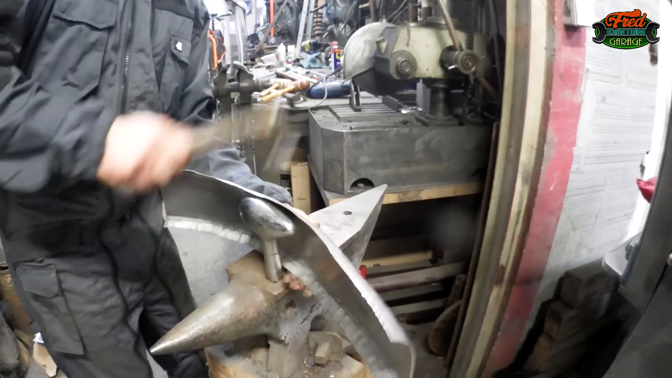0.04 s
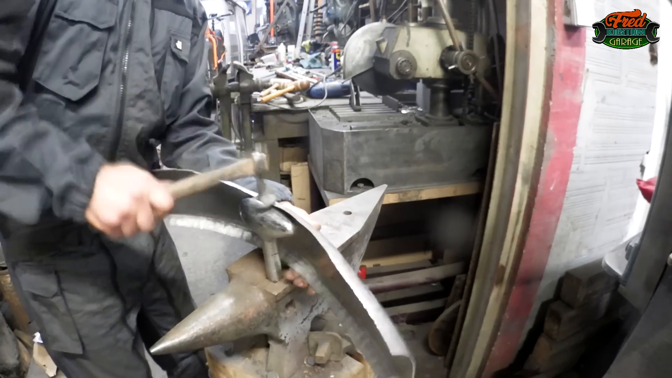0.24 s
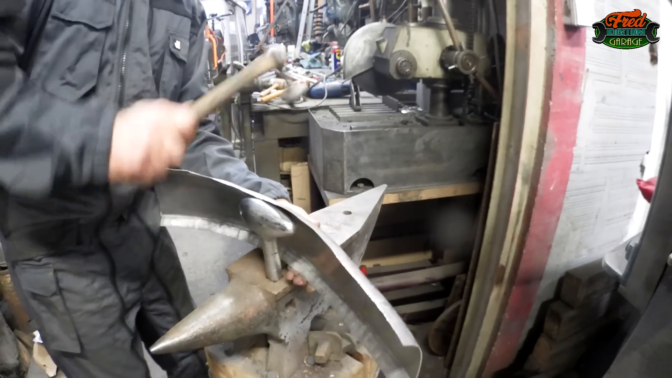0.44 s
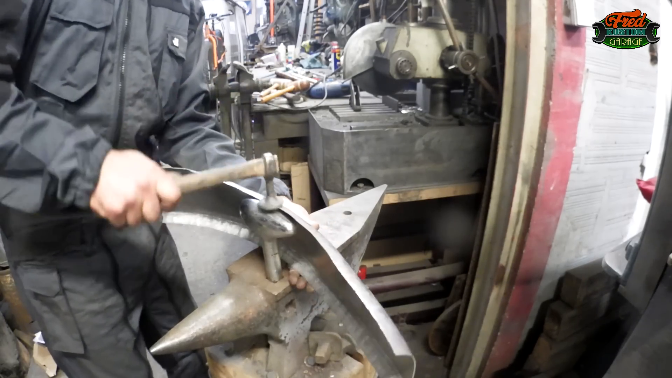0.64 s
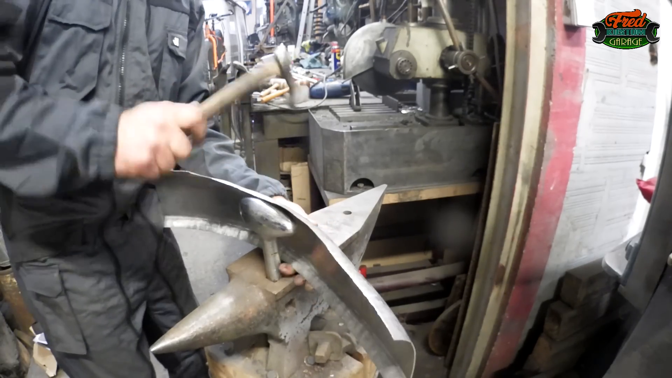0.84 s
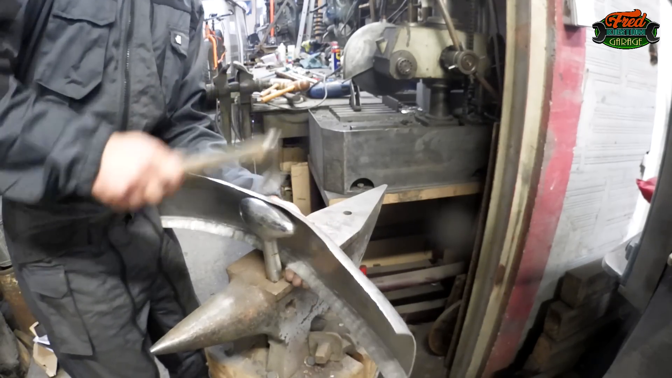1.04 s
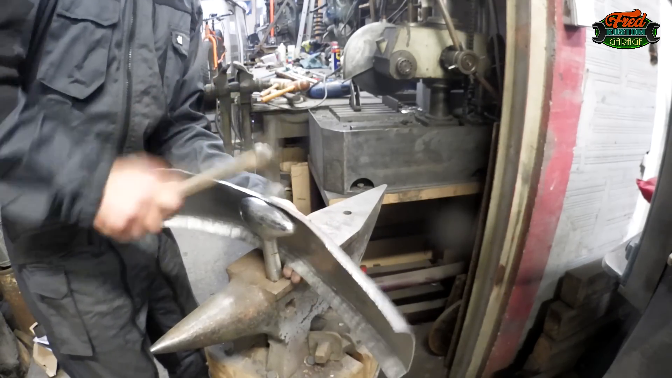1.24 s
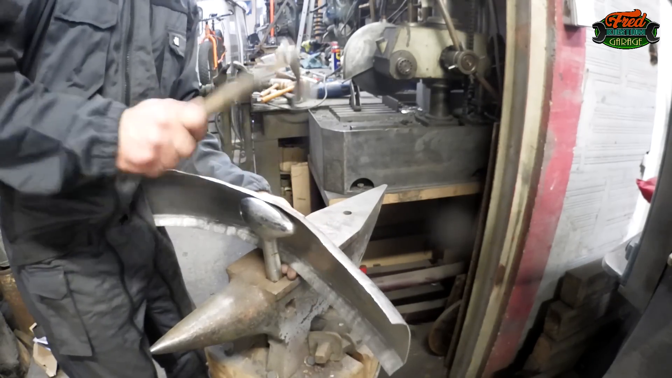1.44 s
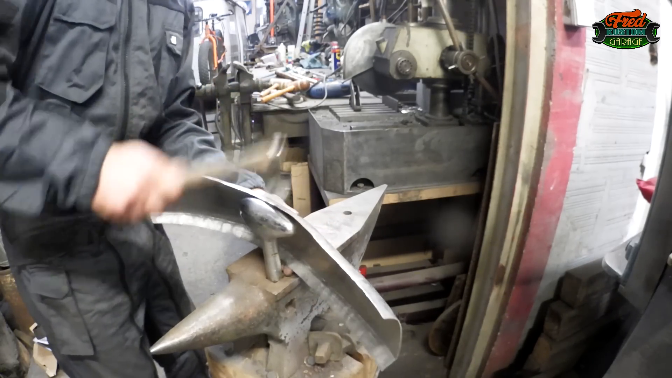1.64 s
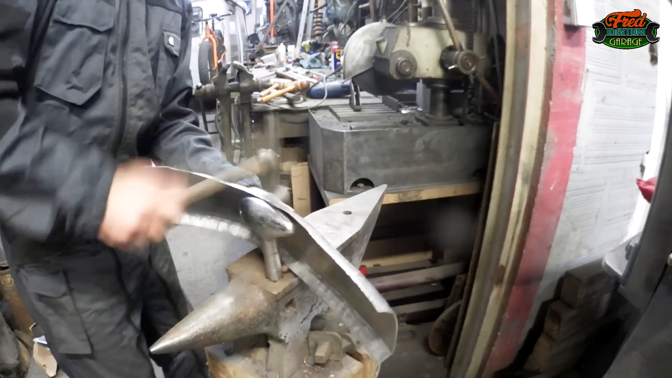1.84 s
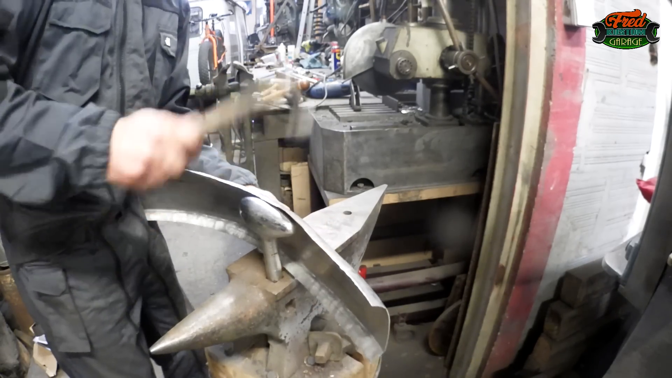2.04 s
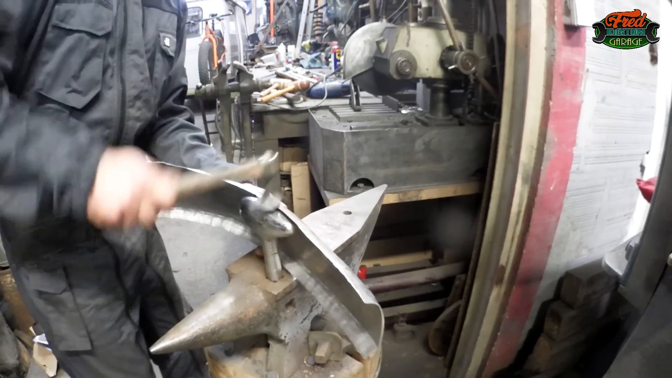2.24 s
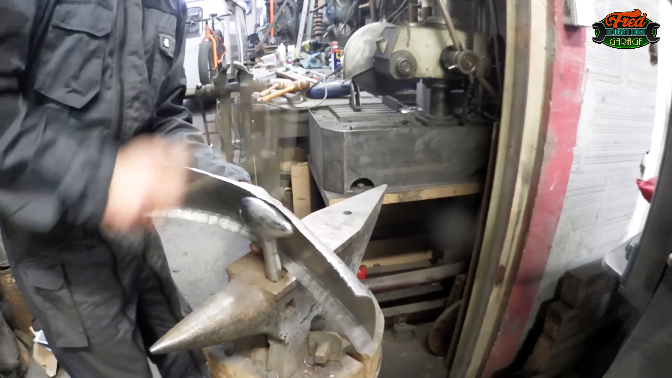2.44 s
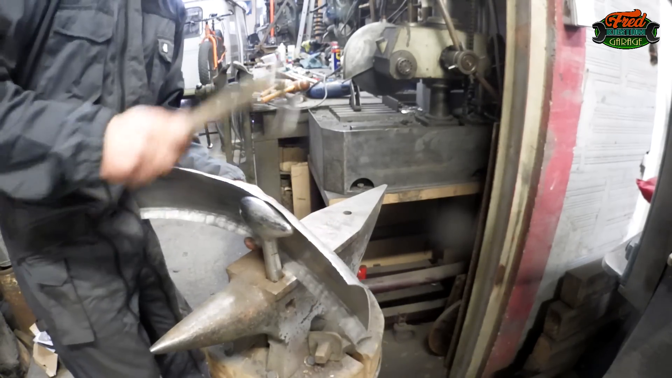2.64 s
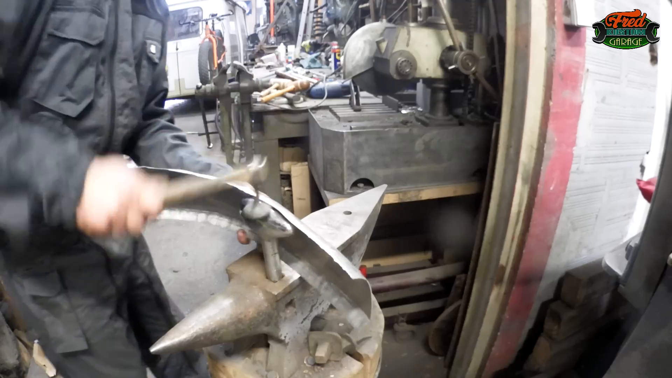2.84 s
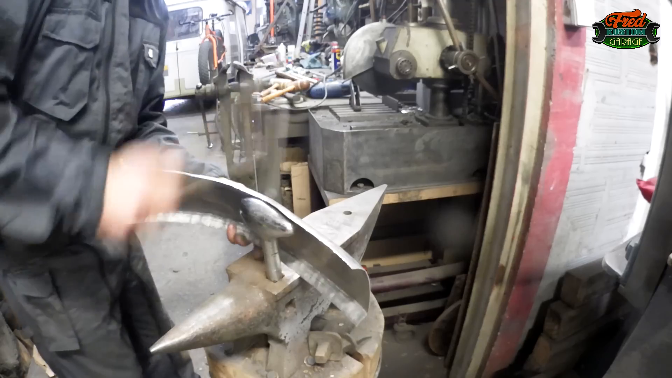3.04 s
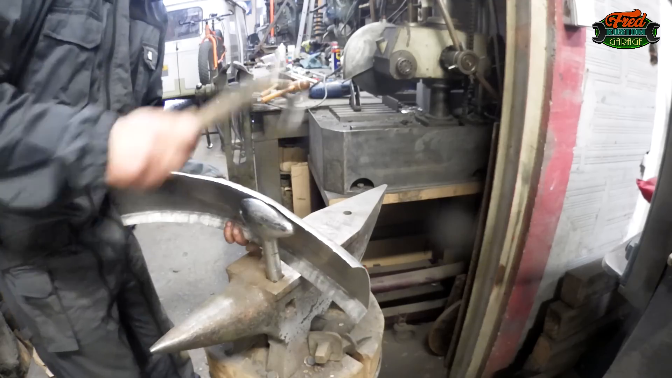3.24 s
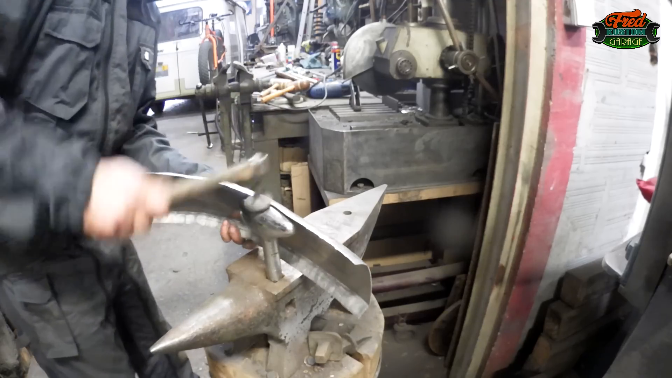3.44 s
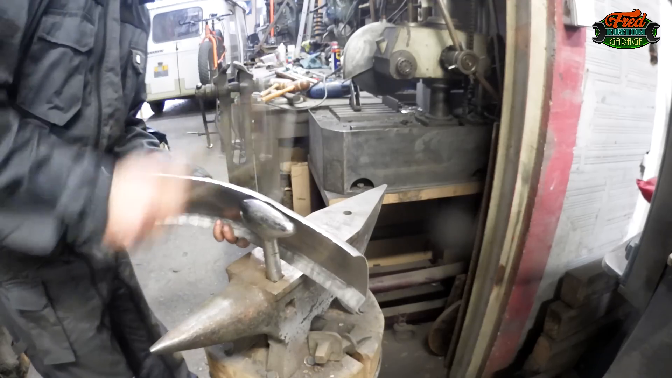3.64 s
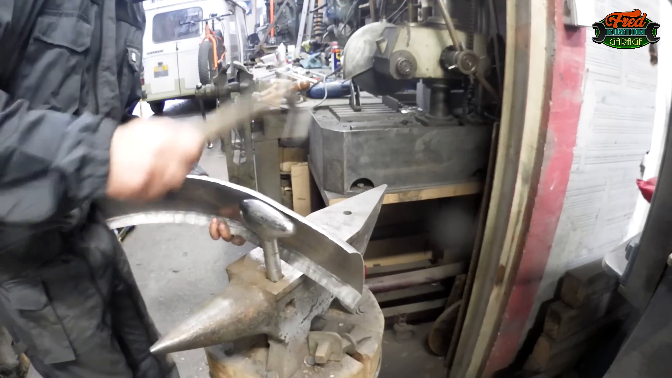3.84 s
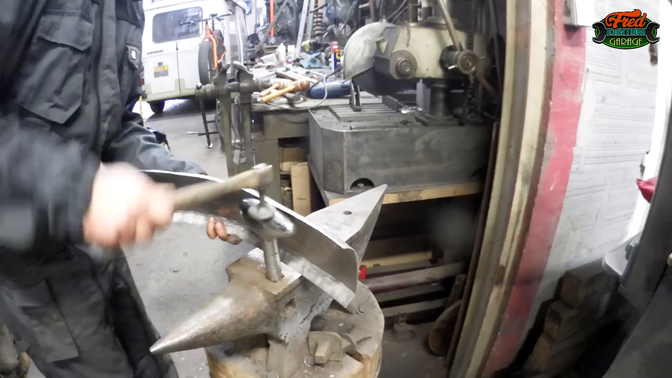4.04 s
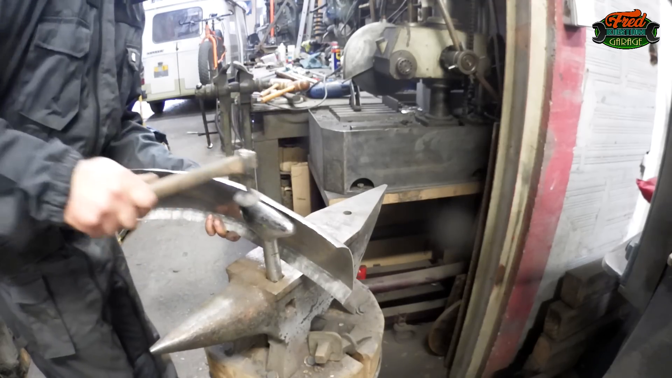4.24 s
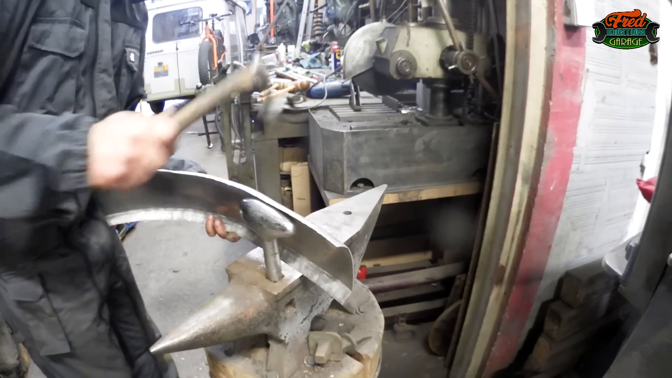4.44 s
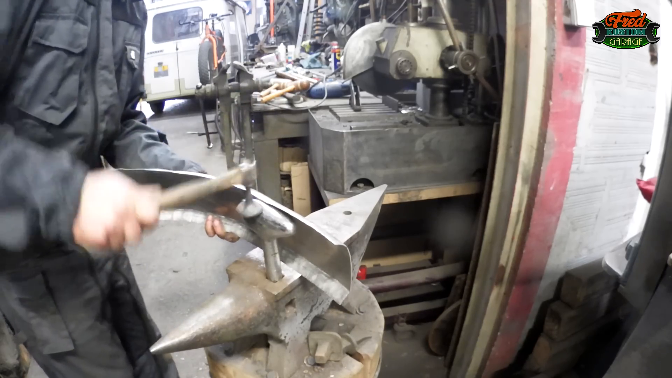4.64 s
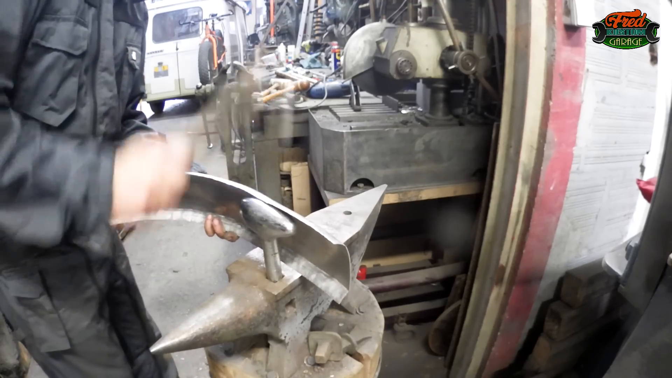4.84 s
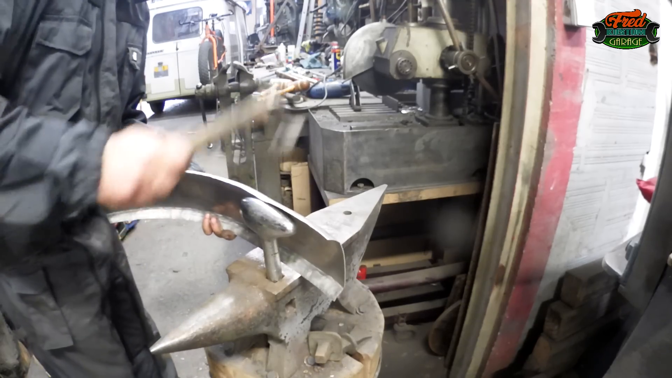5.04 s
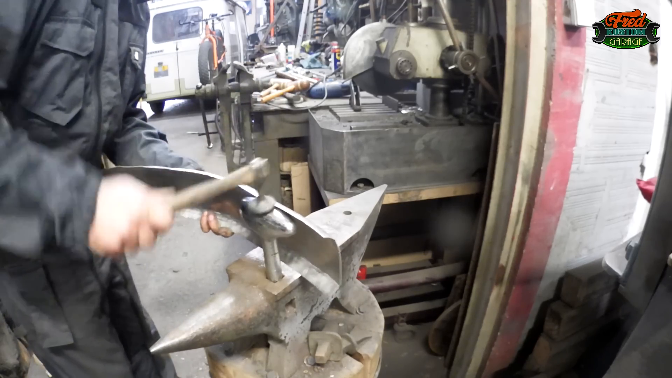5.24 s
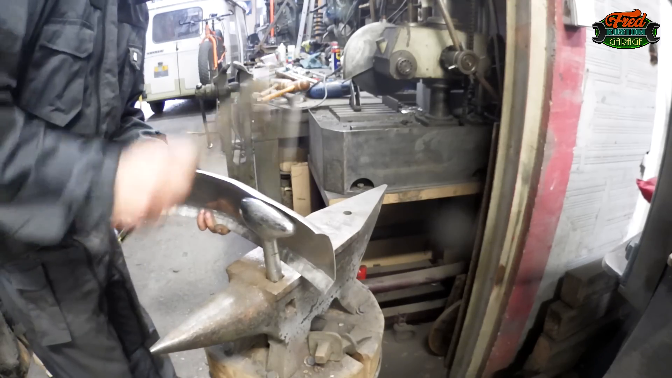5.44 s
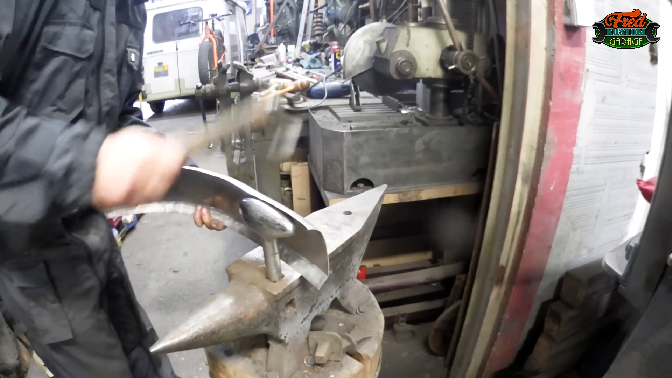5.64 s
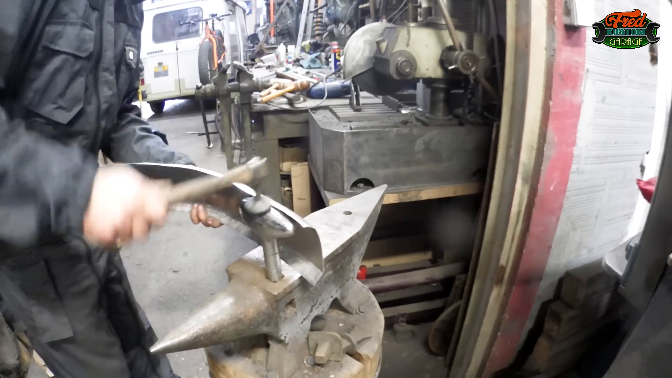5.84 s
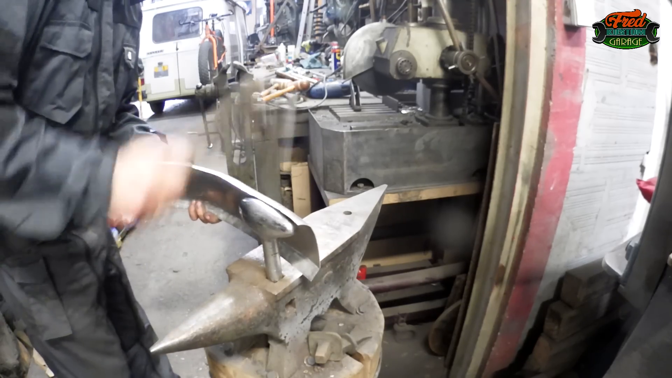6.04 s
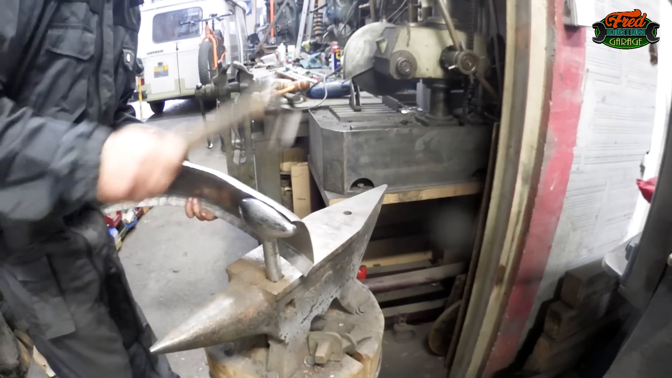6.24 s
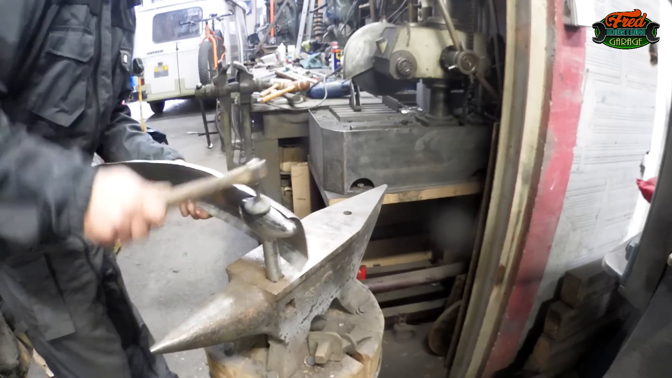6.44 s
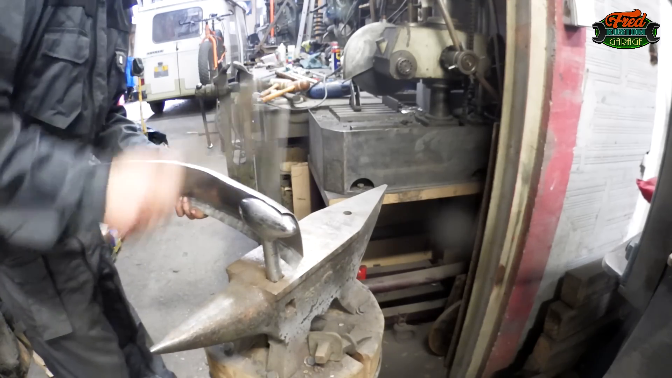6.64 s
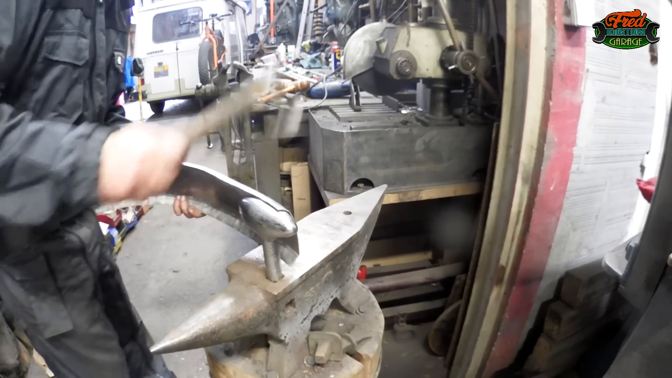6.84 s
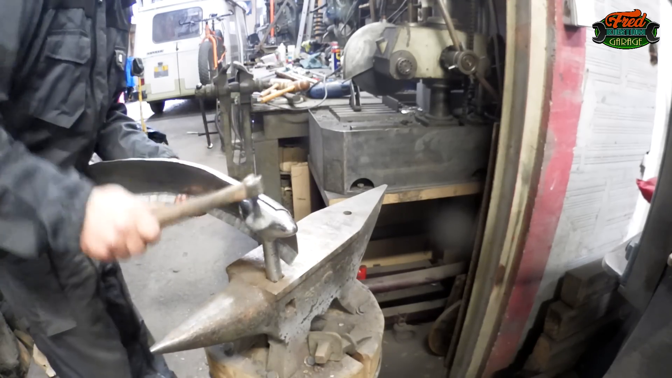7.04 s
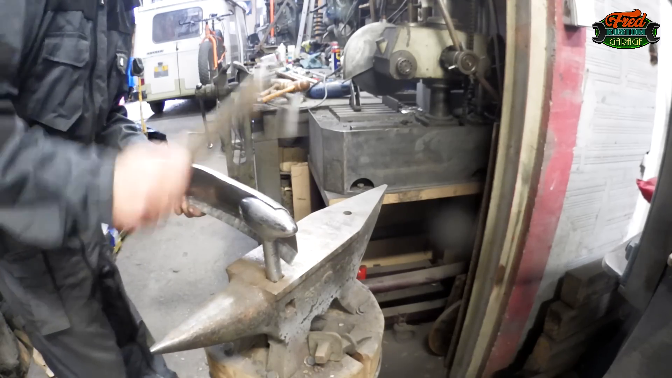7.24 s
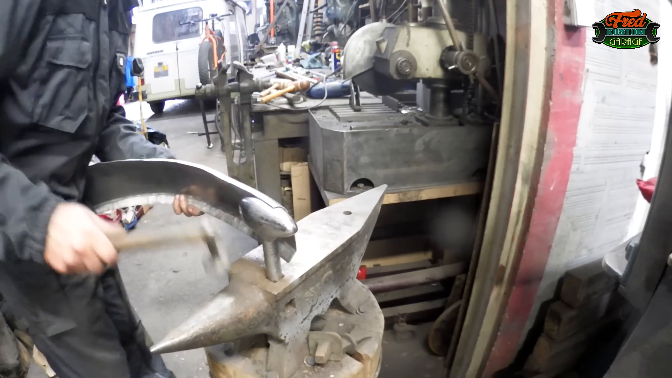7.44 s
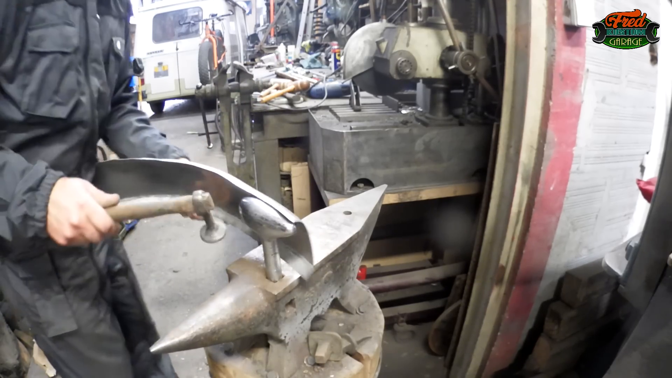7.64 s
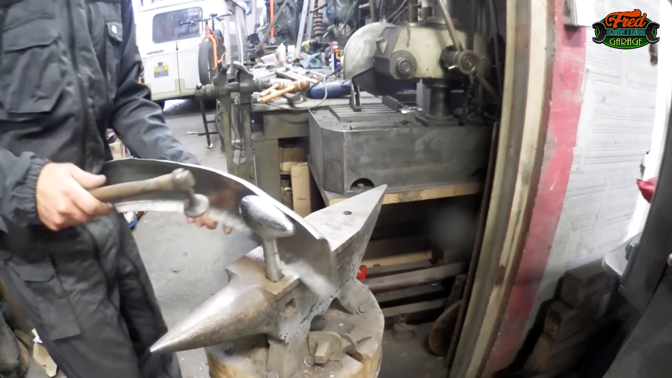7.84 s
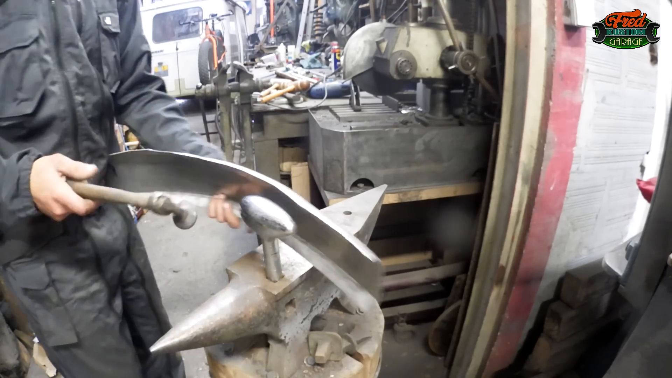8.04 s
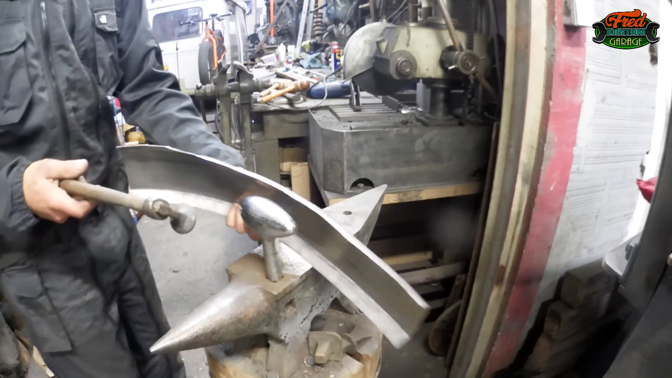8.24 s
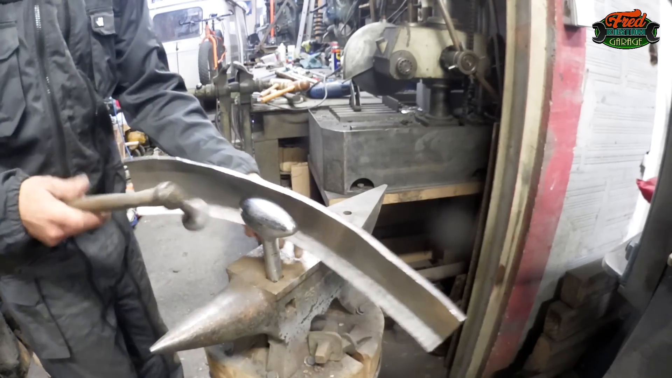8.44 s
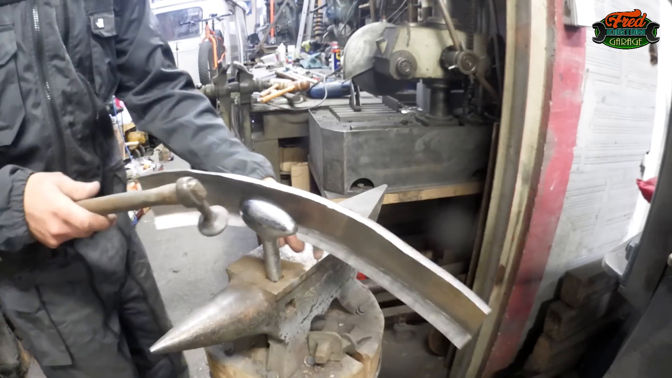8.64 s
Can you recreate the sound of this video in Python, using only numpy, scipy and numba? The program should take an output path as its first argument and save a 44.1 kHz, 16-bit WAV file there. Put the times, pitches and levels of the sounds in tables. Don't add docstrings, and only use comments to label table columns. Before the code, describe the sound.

Loud, bright metallic blows come in a quick even rhythm, varying in force and tone. The thin steel rattles against the stake just after each hit and is damped by the hand. The small stereo camera is an arm's length away and distorts on the peaks; a workshop bay and farther hall answer diffusely. Hammering stops, followed by a few faint metal taps, a dry sliding scrape and a low, faint room murmur.

```python
import sys
import numpy as np
from scipy import signal
from scipy.fft import rfft, irfft, next_fast_len
from scipy.io import wavfile
from scipy.ndimage import uniform_filter1d
from numba import njit

SR = 44100
rng = np.random.default_rng(int(sys.argv[2]) if len(sys.argv) > 2 else 0)


def level_to_linear(level):
    exponent = np.asarray(level, float) / 20
    return 10 ** exponent


def store_wav(level_fs):
    pcm = np.round(np.clip(np.atleast_2d(level_fs), -1, 1) * 32767)
    wavfile.write(sys.argv[1], SR, pcm.T.astype(np.int16))


N = 383669
LEAD = 4096

# t/s, level/dB, hand damping (1 = usual), brightness/(dB per octave), input thump level/dB
HAMMER_BLOWS = [(0.25, -14.5, 0.93, -2, -60), (0.546, -13, 0.96, -0.34, -51),
                (0.961, -14.5, 0.78, -1, -50.5), (1.279, -12, 1.4, -1, -42.5),
                (1.579, -14.5, 1.28, 0.5, -65.5), (1.883, -11, 2.5, 0.6, -61), (2.195, -12, 1.2, 0.6, -41),
                (2.501, -8.5, 1.6, 0.36, -41), (2.804, -6.5, 2.5, 0.7, -49), (3.102, -12, 1.01, 0.3, -47),
                (3.407, -12.5, 1.3, 1, -41.5), (3.703, -15.5, 1.47, 0.4, -52),
                (4.003, -9.5, 2.01, 0.3, -44), (4.606, -12, 1.3, -0.1, -51), (4.922, -10, 2.4, 0.7, -44.5),
                (5.221, -13, 1.2, -0.2, -50.5), (5.52, -11, 1.7, 0.2, -61.5), (5.813, -9, 1.68, -0.56, -51),
                (6.118, -10.5, 1.83, 0.3, -48), (6.418, -7.5, 3.4, -1.24, -50.5),
                (6.715, -9, 2.2, 0.3, -49.5), (7.02, -11, 2.1, 0.3, -58), (7.337, -16.5, 1.73, -1.16, -83)]
# f/Hz, likeness (0-1)
DIFFUSE_LIKENESS = [(100, 0.4), (700, 1), (1400, 0.4), (3000, .05), (15000, 0.09)]


def on_log(table, hz):
    points = np.array(table)
    return np.interp(np.log(hz), np.log(points[:, 0]), points[:, 1])


def index(s):
    return (np.asarray(s) * SR).astype(int) + LEAD


def add_rattle(force, s, db, ms, rise_ms=0.05):
    t = np.arange(3 * LEAD) / SR
    burst = rng.standard_normal(len(t)) * np.exp(-t / (ms / 1000)) / np.sqrt(ms * SR / 2000)
    burst *= 1 - np.exp(-t / (rise_ms / 1000))
    force[index(s):index(s) + len(t)] += level_to_linear(db) * burst


def add_hammer(force, blows):
    drive_db, chatter_db, buzz_db, buzz_ms = 4.5, -12, -15.5, 27.7
    for s, db, damping, *_ in blows:
        force[index(s)] += level_to_linear(db + drive_db)
        grip = np.clip(damping, 0.3, 3) ** -0.27
        chatter_ms = max(14.9 * grip * np.exp(-0.076 * s), 1)
        add_rattle(force, s, db + drive_db + chatter_db + 10 * np.log10(chatter_ms), chatter_ms)
        add_rattle(force, s, db + drive_db + buzz_db + 10 * np.log10(buzz_ms), buzz_ms)


def add_slaps(force):
    # t/s, level/dB
    slap_events = [(0.285, -6.5), (0.576, -7), (0.596, -5.5), (0.993, -2.5), (1.012, -9.5), (1.309, -1),
                   (1.612, -4), (1.631, -9), (1.911, -2), (2.223, -4), (2.522, -0.5), (2.54, -10),
                   (2.837, -7), (2.851, -6.5), (3.121, -13), (3.429, -14.5), (3.717, 0.5), (3.744, -7.5),
                   (4.029, -1.5), (4.041, -12), (4.637, -2.5), (4.942, -14), (5.245, -12), (5.543, -9.5),
                   (5.829, -11.5), (6.131, -8.5), (6.444, -4), (6.732, -10), (7.043, -14.5), (7.365, -12)]
    for s, db in slap_events:
        add_rattle(force, s, db - 5.5, 3.5, rise_ms=0.79)


def slide():
    # t/s at the height, level/dB, swell/(dB per s), fade/(dB per s)
    slide_strokes = [
        (7.6, -49.5, 90, 35),
        (7.712, -43.5, 150, 130),
        (7.838, -45, 110, 448),
        (7.909, -53, 70, 330),
        (7.99, -61, 150.5, 150),
        (8.182, -51, 67, 490),
        (8.3, -75, 60, -8),
        (8.6, -68, 350, -28),
    ]
    now = np.arange(-LEAD, N) / SR
    levels = []
    for s, db, swell, fade in slide_strokes:
        away_db = np.where(now < s, swell * (s - now), fade * (now - s))
        levels.append(db - 28.0 - away_db)
    size_db = 3.3 * np.minimum(rng.exponential(size=N + LEAD), 6)
    grit = rng.standard_normal(N + LEAD) * level_to_linear(size_db) * (rng.random(N + LEAD) < 0.3)
    return level_to_linear(np.max(levels, axis=0)) * grit


def add_knocks(force):
    # t/s, level/dB
    knock_events = [
        (7.685, -42),
        (7.706, -26.5),
        (7.819, -33.5),
        (7.831, -38),
        (7.899, -44),
        (8.154, -42.5),
        (8.59, -55),
    ]
    for s, db in knock_events:
        add_rattle(force, s, db - 8.5, 4.6, rise_ms=0.27)


def contacts(blows):
    force = np.zeros(N + 4 * LEAD)
    add_hammer(force, blows)
    add_slaps(force)
    add_knocks(force)
    return force[:N + LEAD] + slide()


@njit
def ring(force, starts, poles, into, left, right):
    out = np.zeros((2, len(force)))
    for m in range(poles.shape[1]):
        z = 0j
        for b in range(len(starts) - 1):
            p, g = poles[b, m], into[b, m]
            for i in range(starts[b], starts[b + 1]):
                z = z * p + g * force[i] + 1e-18
                out[0, i] += (z * left[b, m]).imag
                out[1, i] += (z * right[b, m]).imag
    return out


def radiate(bare):
    # f/Hz, level/dB
    radiation = [(59, -78), (100, -48), (452, -21.5), (646, -19), (831, -9.5), (942, -7), (1530, -1),
                 (3180, 4.5), (3530, 4), (4350, 6.5), (7600, -10.5), (8900, -34.5), (10100, -45.5),
                 (15000, -64)]
    size = next_fast_len(N + LEAD)
    colour = level_to_linear(on_log(radiation, np.arange(size // 2 + 1) * SR / size + 1e-3))
    colour[size // 5:] += level_to_linear(-39)
    return irfft(rfft(bare, size) * colour, size)[:, :N + LEAD]


def sheet(count=600):
    # level/dB, hand damping (1 = usual), brightness/(dB per octave), thump/dB
    blow_before = (-10, 1.37, -2, -50)
    # t/s, damping (1 = usual), brightness/(dB per octave)
    regrips = [
        (7.561, 2, -2),
        (7.675, 1.4, -4),
        (7.8, 1.7, -3.5),
        (7.87, 0.93, -0.5),
        (7.959, 1, -2),
        (8.07, 1.5, -3.5),
        (8.299, 1.5, -4.5),
        (8.58, 0.94, -3),
    ]
    # f/Hz, t60/s
    crowd_t60 = [(200, 0.16), (1000, .085), (4000, 0.041), (9000, 0.072), (15000, 0.042)]
    # f/Hz, level over the crowd/dB, t60/s
    strong_modes = [(426, 4.5, .2), (760, 0, 0.3), (1069, 3, 0.3), (1165, -3, 0.3), (1737, -2.5, 0.19),
                    (2056, 3.5, 0.09), (2250, 2.5, 0.18), (2477, -1, 0.25), (3200, 4, 0.17), (3823, 1, .12),
                    (4006, 2, 0.14), (4230, -1, 0.21), (4450, -2, .1), (8100, -1, 0.16)]
    stake_lines = [455, 856, 1082, 1255, 1500, 1722, 2115, 2255, 2702, 3094, 3777, 3950, 4062, 4478]
    # f/Hz, likeness (0-1)
    close_likeness = [(100, 1), (1500, .88), (3200, .8), (5000, 0), (8000, 0.06)]

    silent_grips = [(s, -200, damping, tilt, -200) for s, damping, tilt in regrips]
    blows = np.array([(-0.055, *blow_before), *HAMMER_BLOWS, *silent_grips])

    place = (np.arange(count) + rng.random(count)) / count
    crowd = 150 * (15000 / 150) ** (place ** 0.62)
    spacing = np.gradient(uniform_filter1d(crowd, size=15, mode="nearest")) + 1
    stake_modes = [(f, -7.5, 0.22) for f in stake_lines]
    strong_hz, strong_db, strong_t60 = np.transpose(list(strong_modes) + stake_modes)
    hz = np.r_[crowd, strong_hz]
    t60 = np.r_[on_log(crowd_t60, crowd) * level_to_linear(1.5 * rng.standard_normal(count)), strong_t60]
    db = 10 * np.log10(np.interp(hz, crowd, spacing) / 3000) + np.r_[0 * crowd, strong_db]

    chance = rng.standard_normal((len(blows), 5, len(hz)))
    tuned = np.minimum(hz * (1 + 0.0042 * chance[:, 0]), 0.45 * SR)
    tuned[:, -len(stake_lines):] = stake_lines
    damping = np.clip(blows[:, 2:3], 0.3, 3)
    poles = np.exp(2j * np.pi * tuned / SR - np.log(1000) * damping / (t60 * SR))

    tilt_db = np.clip(blows[:, 3:4], -7, 3) * np.log2(np.maximum(hz, 800) / 2500)
    into = level_to_linear(db + tilt_db + 0.47 * chance[:, 1])
    into[len(HAMMER_BLOWS) + 1:, -2] *= level_to_linear(11)

    alike = np.clip(on_log(close_likeness, hz), 0, 1)
    turn = np.exp(1j * (np.pi * hz * 1.9 / SR + np.arccos(alike) * chance[:, 2] / 2))
    phase = np.exp(1j * np.pi * chance[:, 4])
    pan = level_to_linear(-4 / 2 + 1.5 * chance[:, 3])

    starts = np.r_[0, index(blows[1:, 0]), N + LEAD]
    force = contacts(blows)
    bare = ring(force, starts, poles, into, phase * pan * turn, phase / turn / pan)
    return radiate(bare + level_to_linear(10) * force)


def pair(size, alike):
    mid, side = rfft(rng.standard_normal((2, size)))
    alike = np.clip(alike, 0, 1)
    opposed = np.sqrt(1 - alike) * side * np.array([[1], [-1]])
    return (np.sqrt(1 + alike) * mid + opposed) / np.sqrt(2)


def loose_metal(length):
    spacing_hz, width_hz, height_db = 45, 6, 7.5
    whole = next_fast_len(length)
    step = SR / whole
    wide = int(width_hz / step)
    lines = np.zeros(whole // 2 + 1)
    slots = np.arange(int(SR / 2 / spacing_hz) - 1)
    lines[((slots + rng.random(len(slots))) * spacing_hz / step).astype(int)] = wide
    lines = uniform_filter1d(lines, wide)
    alike = on_log(DIFFUSE_LIKENESS, np.arange(whole // 2 + 1) * SR / whole + 1)
    return irfft((1 + level_to_linear(height_db) * lines) * pair(whole, alike), whole)[:, :length]


def room(x, size=512):
    # f/Hz, t60/s
    bay_t60 = [(100, 0.072), (500, 0.29), (2000, 0.49), (5000, 0.43), (8000, 0.43), (15000, 0.11)]
    far_db, far_stretch = -7.5, 1.87
    hop = size // 4
    hz, _, z = signal.stft(x, SR, nperseg=size, noverlap=size - hop)
    power = uniform_filter1d(abs(z) ** 2, size=15, axis=0, mode="nearest")
    t60 = on_log(bay_t60, hz + 1)
    keep = level_to_linear(-120 * hop / SR / np.array([t60, far_stretch * t60]))
    share = level_to_linear([[0], [2 * far_db]]) * (1 - keep)
    store, held = 0 * keep, np.zeros_like(power)
    for frame in range(2, power.shape[1]):
        store = keep * store + share * power[:, frame - 2]
        held[:, frame] = store.sum(0)
    fresh = signal.stft(loose_metal(len(x)), SR, nperseg=size, noverlap=size - hop)[2]
    fresh = fresh / np.sqrt(np.mean(abs(fresh) ** 2))
    echo = signal.istft(fresh * np.sqrt(abs(held)), SR, nperseg=size, noverlap=size - hop)[1]
    return echo[:, :len(x)]


def shop():
    # f/Hz, level/dB
    murmur = [(35, -66), (91, -14.5), (204, -4.5), (390, 1.5), (564, -2.5), (4110, -19), (7500, -18),
              (15000, -19)]
    size = next_fast_len(N)
    hz = np.arange(size // 2 + 1) * SR / size + 1e-3
    spectrum = pair(size, on_log(DIFFUSE_LIKENESS, hz)) * level_to_linear(on_log(murmur, hz)) * (hz > 30)
    x = irfft(spectrum, size)[:, :N]
    return x * level_to_linear(-79) / x.std()


def thumps():
    t = np.arange(LEAD) / SR / 0.0045
    out = np.zeros(N)
    for s, *_, db in HAMMER_BLOWS:
        at = index(s) - LEAD
        out[at:at + LEAD] += level_to_linear(db + 9) * t * np.exp(1 - t)
    return out * level_to_linear([[-3], [3]])


def overload(dry):
    ceiling, knee = 0.4, 8.0
    clipped = dry / (1 + abs(dry / ceiling) ** knee) ** (1 / knee)
    made = signal.sosfilt(signal.butter(1, 260, "high", fs=SR, output="sos"), clipped - dry)
    treble = signal.sosfiltfilt(signal.butter(3, 10500, "high", fs=SR, output="sos"), made)
    return dry + made + (level_to_linear(4.5) - 1) * treble


def drop_tails(x):
    frame_s, offset_s, lead_s, reach_s = 0.032, 0.006, 0.0058, 0.0295
    gate = np.ones(N)
    for s, *_ in HAMMER_BLOWS:
        late = (s - offset_s) % frame_s
        if late < reach_s:
            gate[int((s - late) * SR):int((s - lead_s) * SR)] = 0
    return x * (0.0027 + uniform_filter1d(gate, size=130))


def smear(x):
    ahead = int(5.1 * SR / 1000)
    for s, *_ in HAMMER_BLOWS:
        at = index(s) - LEAD
        x[:, at - ahead:at] += level_to_linear(-19) * np.linspace(0.1, 1, ahead) * x[:, at + ahead:at:-1]
    return x


def scene():
    near = sheet()
    echo = level_to_linear(-13.5) * room(near.mean(0))
    return (near + echo)[:, LEAD:] + shop()


def low_pass(x):
    return signal.sosfilt(signal.butter(12, 15920, fs=SR, output="sos"), x)


def record(dry):
    x = overload(dry) + thumps()
    x = signal.sosfilt(signal.butter(1, 20, "high", fs=SR, output="sos"), x)
    x = signal.sosfilt(signal.ellip(6, 0.5, 25, 14800, fs=SR, output="sos"), x)
    x = smear(drop_tails(x))
    return low_pass(x)


dry = scene()
out = record(dry)
store_wav(out)
```